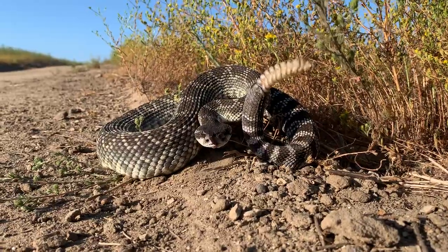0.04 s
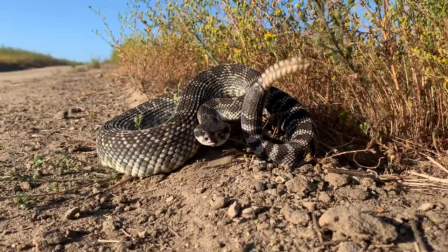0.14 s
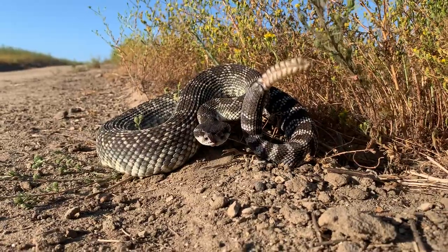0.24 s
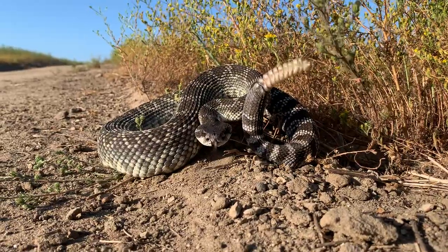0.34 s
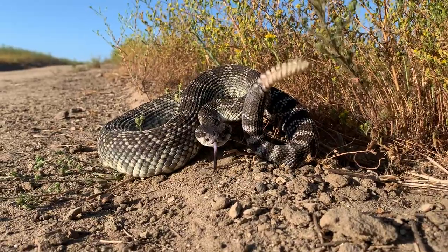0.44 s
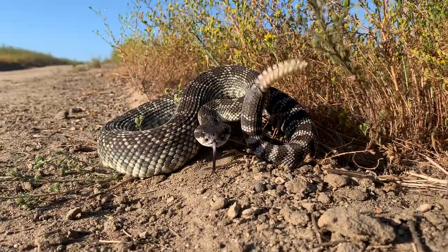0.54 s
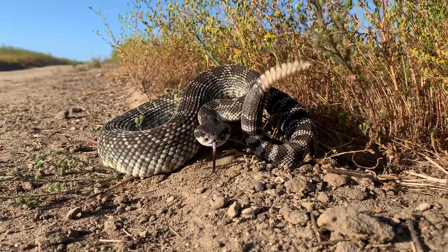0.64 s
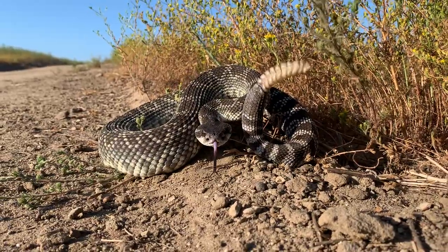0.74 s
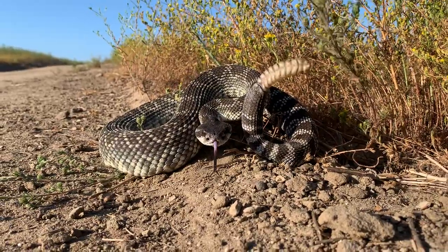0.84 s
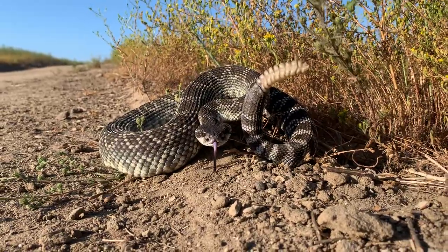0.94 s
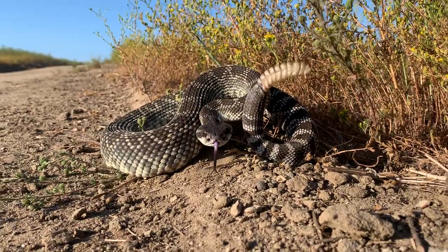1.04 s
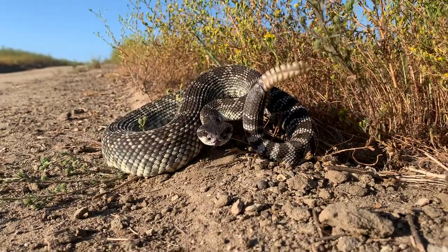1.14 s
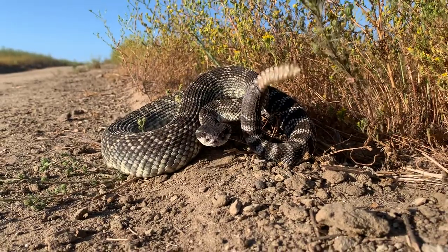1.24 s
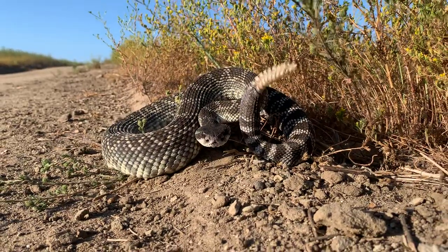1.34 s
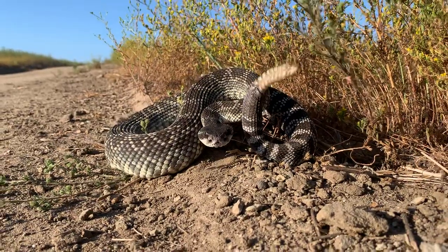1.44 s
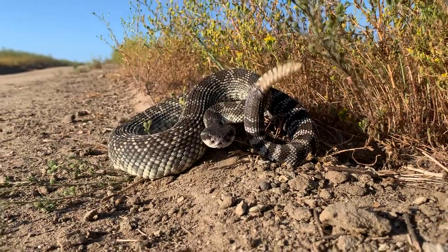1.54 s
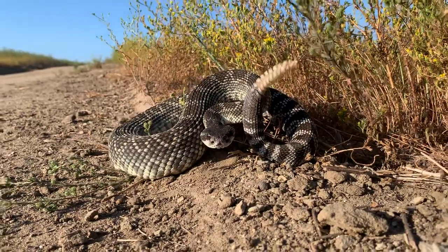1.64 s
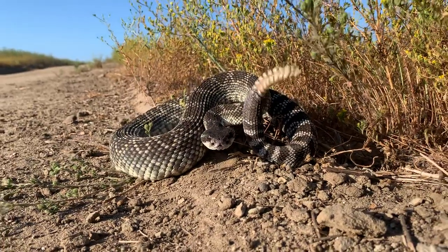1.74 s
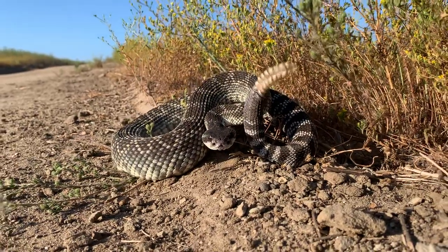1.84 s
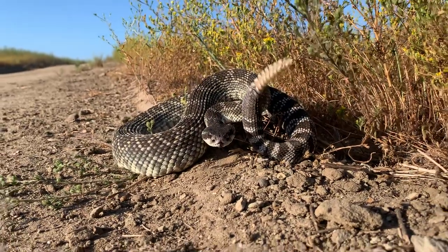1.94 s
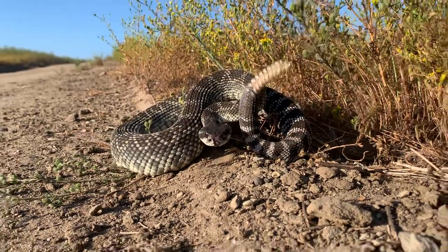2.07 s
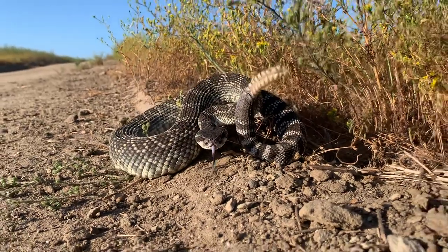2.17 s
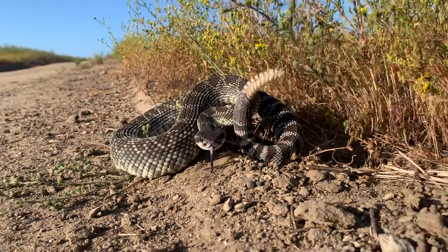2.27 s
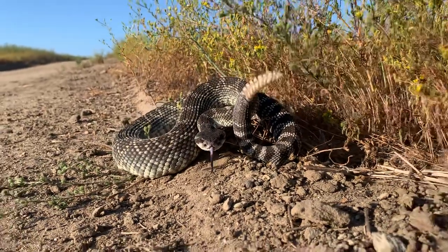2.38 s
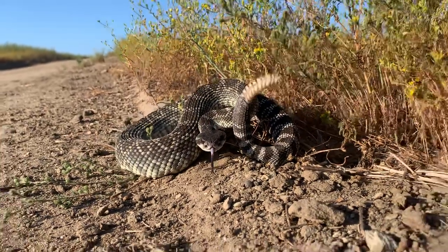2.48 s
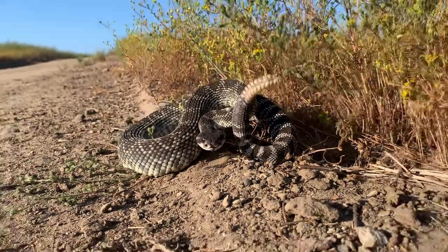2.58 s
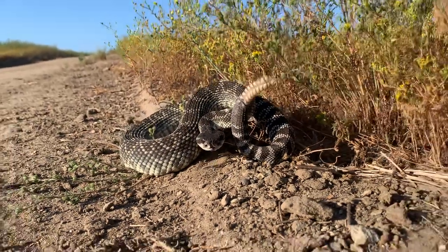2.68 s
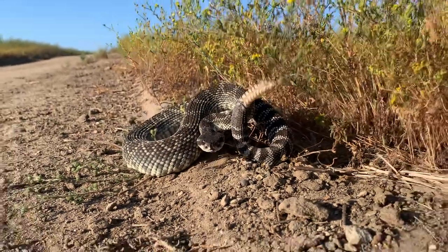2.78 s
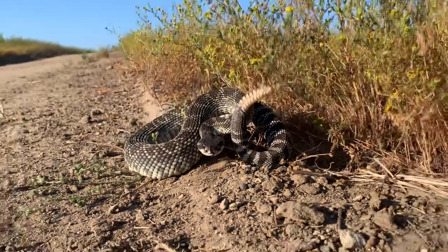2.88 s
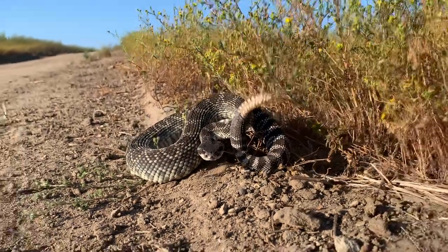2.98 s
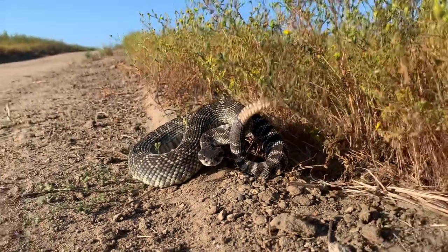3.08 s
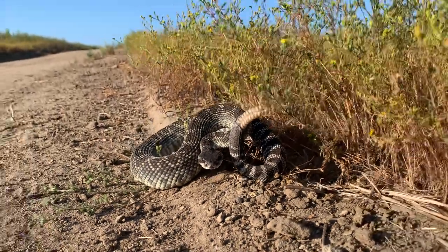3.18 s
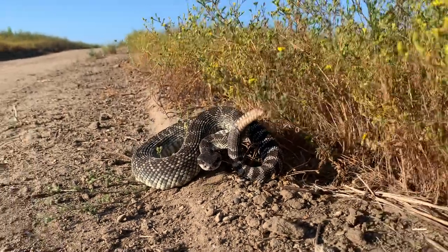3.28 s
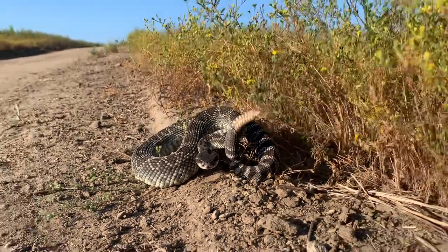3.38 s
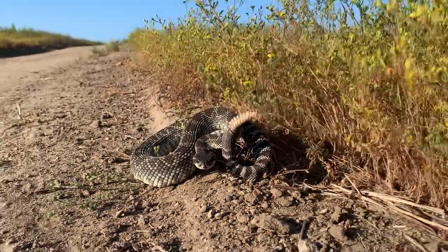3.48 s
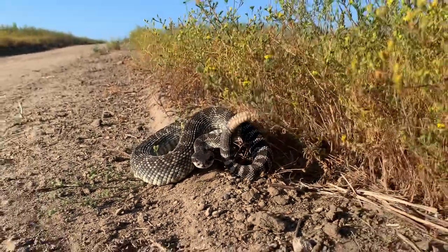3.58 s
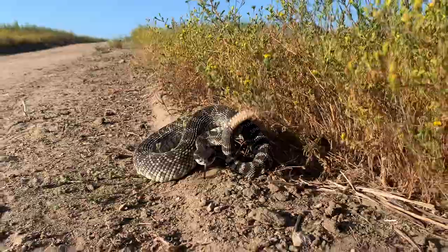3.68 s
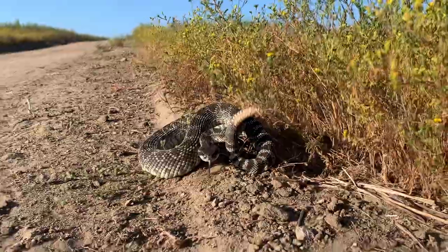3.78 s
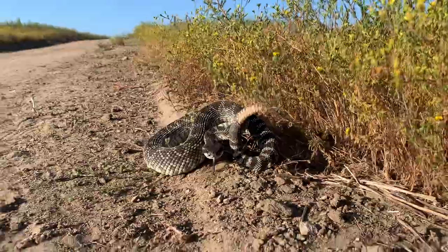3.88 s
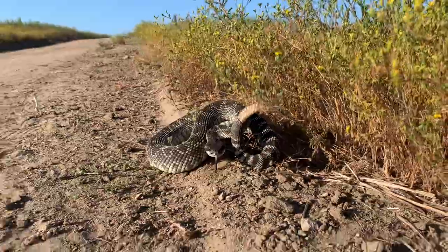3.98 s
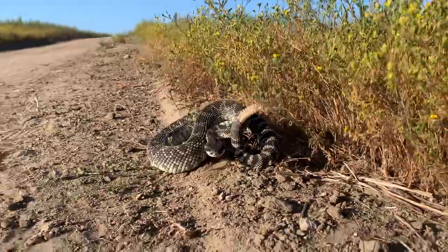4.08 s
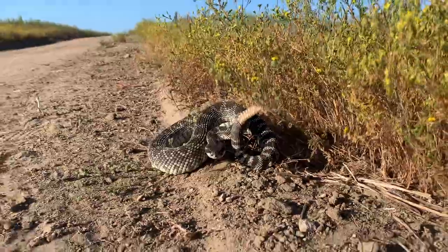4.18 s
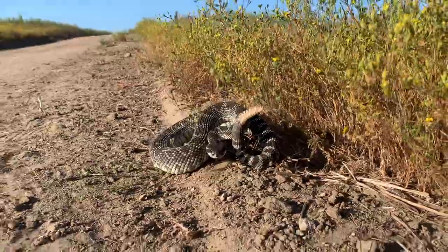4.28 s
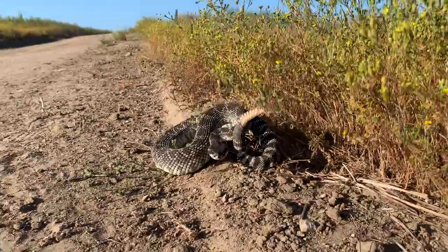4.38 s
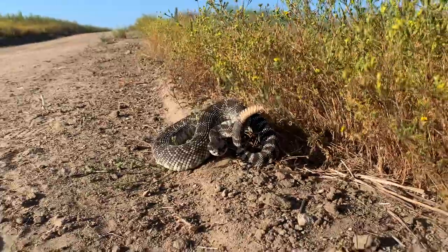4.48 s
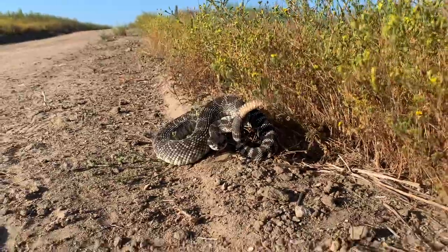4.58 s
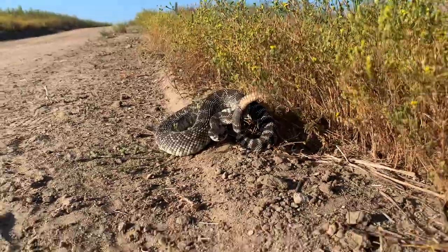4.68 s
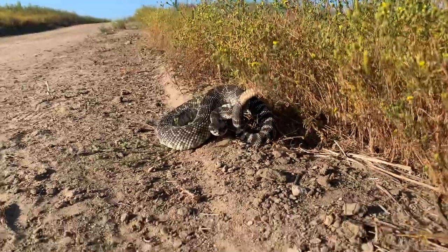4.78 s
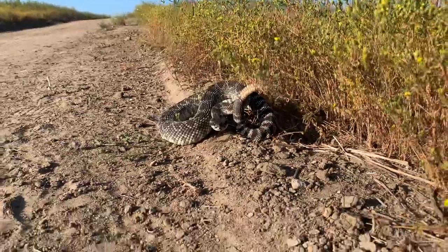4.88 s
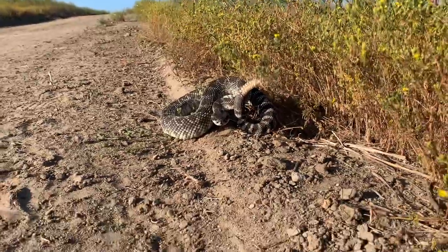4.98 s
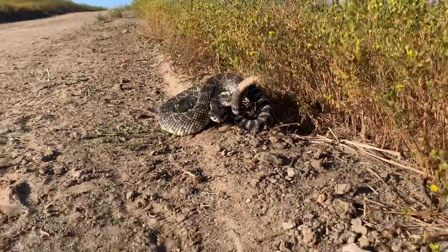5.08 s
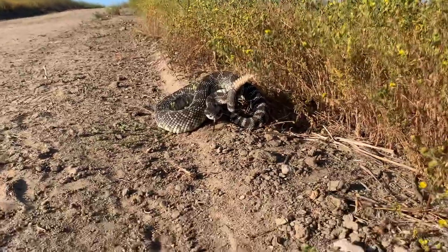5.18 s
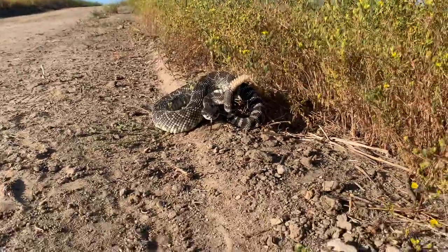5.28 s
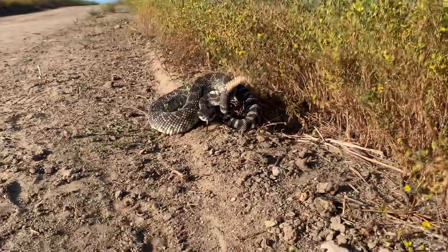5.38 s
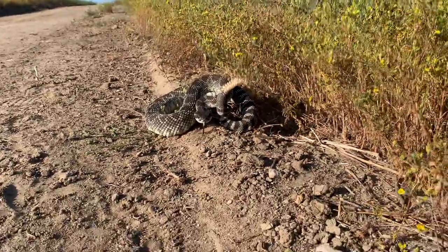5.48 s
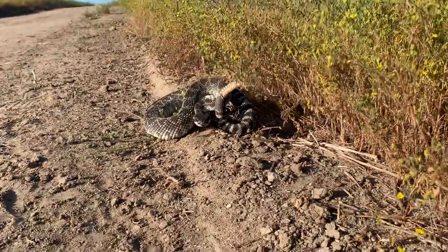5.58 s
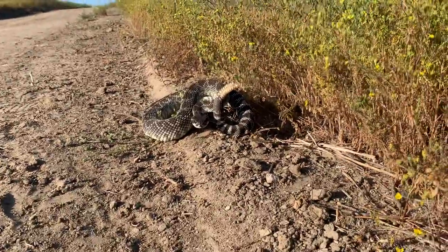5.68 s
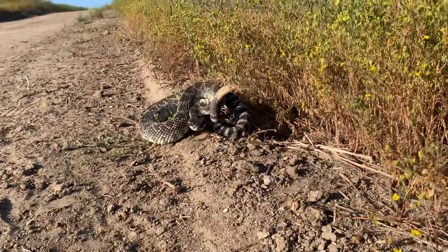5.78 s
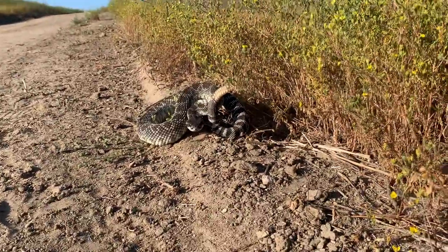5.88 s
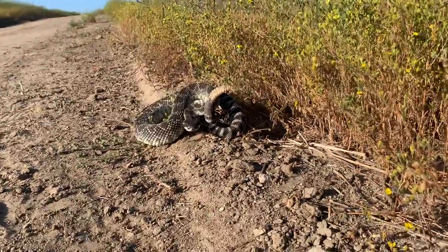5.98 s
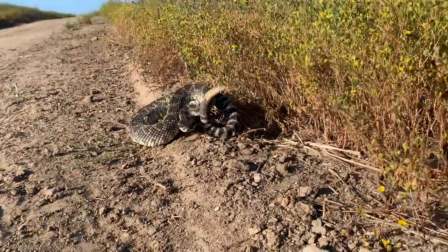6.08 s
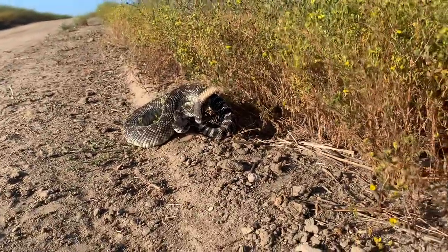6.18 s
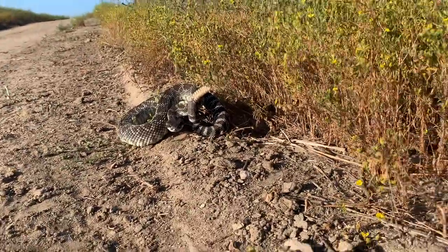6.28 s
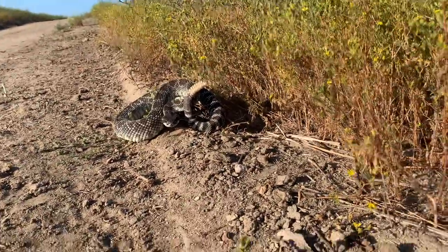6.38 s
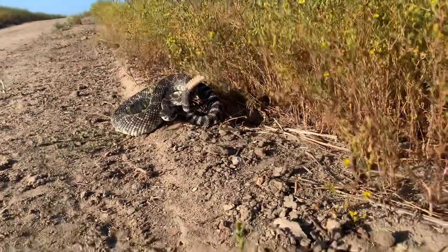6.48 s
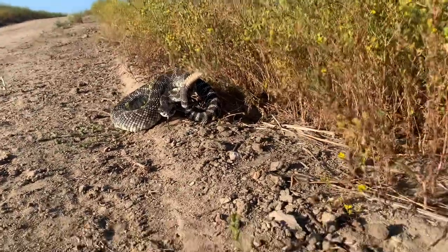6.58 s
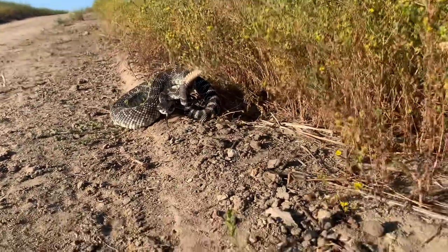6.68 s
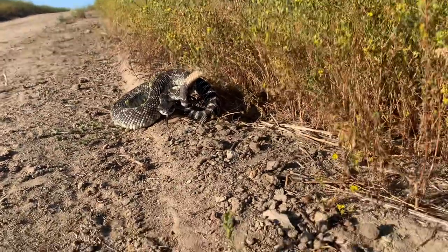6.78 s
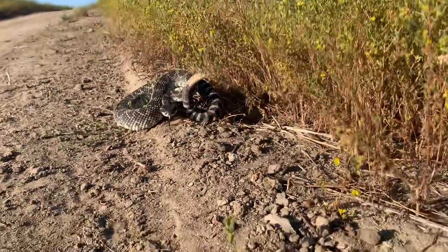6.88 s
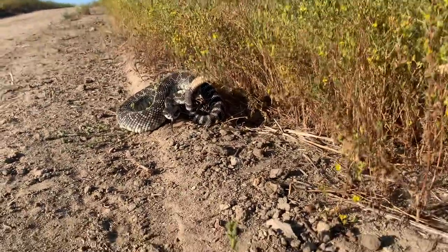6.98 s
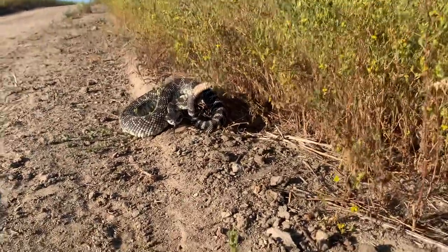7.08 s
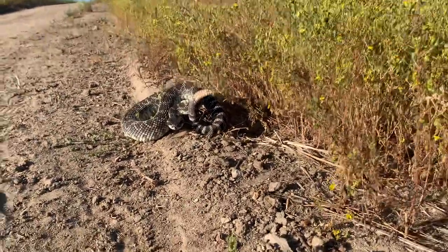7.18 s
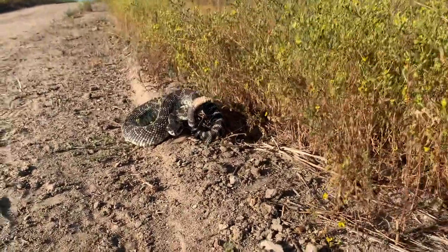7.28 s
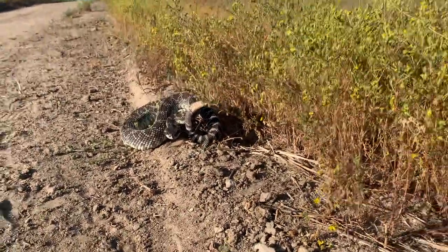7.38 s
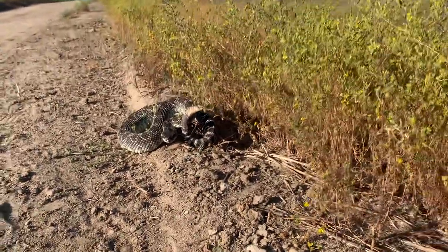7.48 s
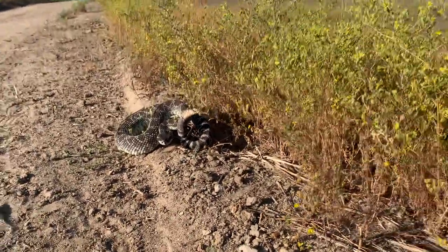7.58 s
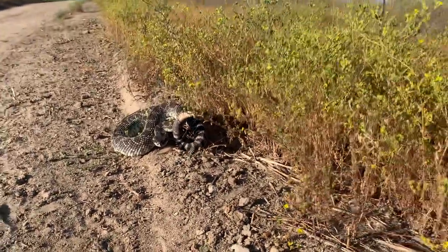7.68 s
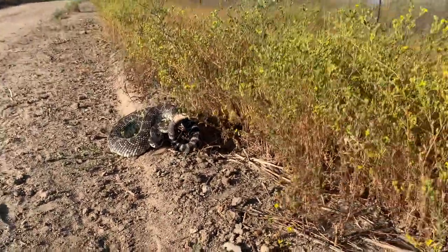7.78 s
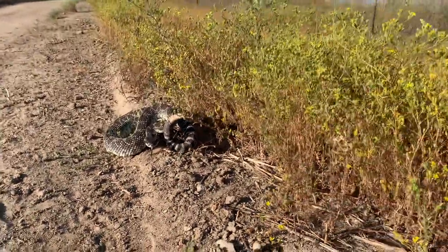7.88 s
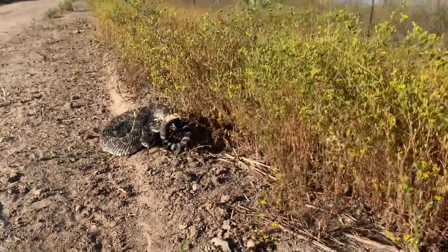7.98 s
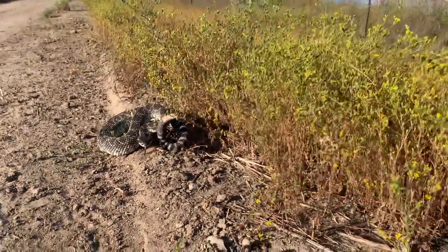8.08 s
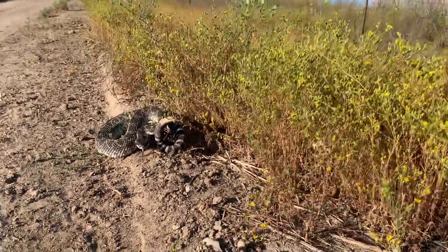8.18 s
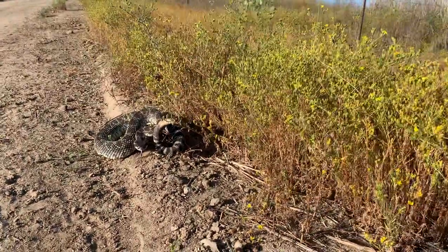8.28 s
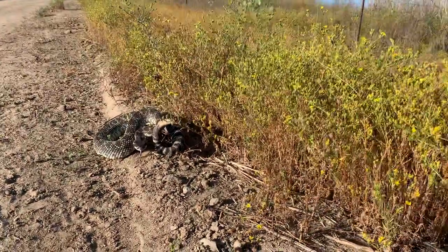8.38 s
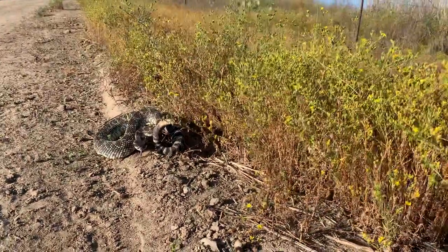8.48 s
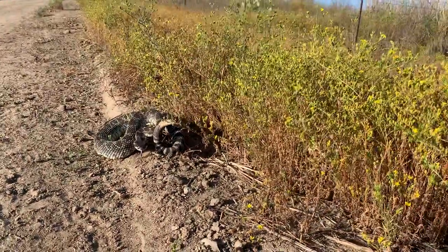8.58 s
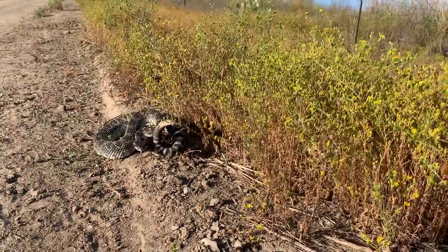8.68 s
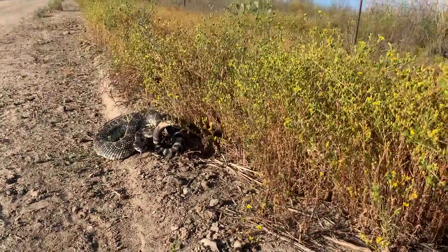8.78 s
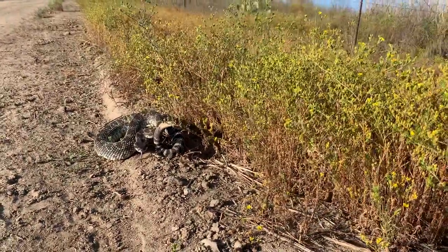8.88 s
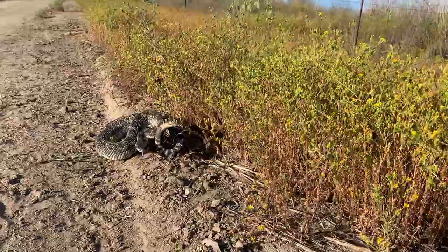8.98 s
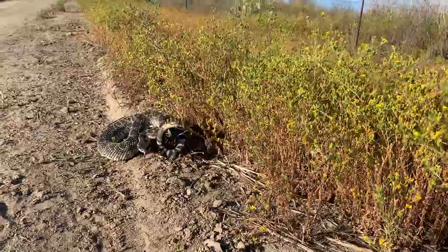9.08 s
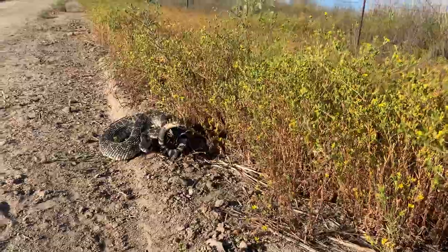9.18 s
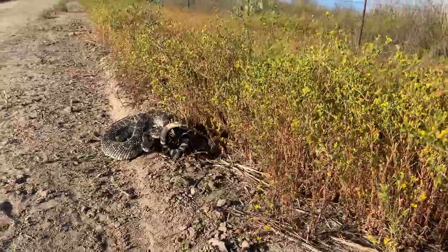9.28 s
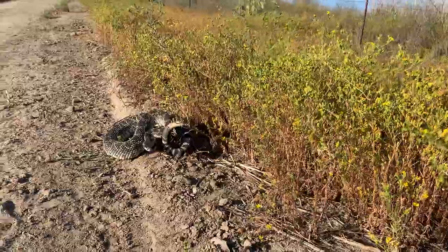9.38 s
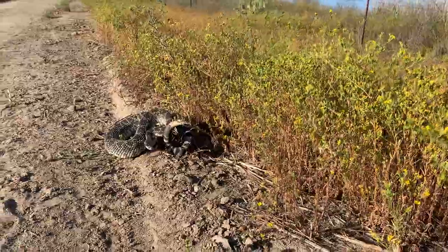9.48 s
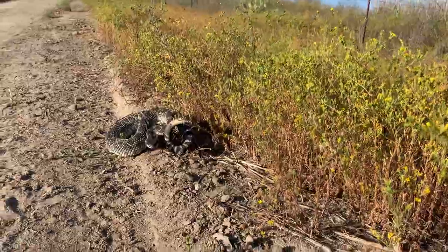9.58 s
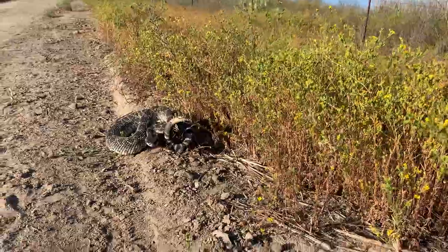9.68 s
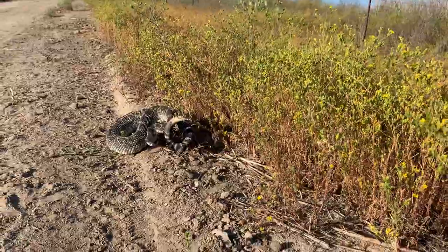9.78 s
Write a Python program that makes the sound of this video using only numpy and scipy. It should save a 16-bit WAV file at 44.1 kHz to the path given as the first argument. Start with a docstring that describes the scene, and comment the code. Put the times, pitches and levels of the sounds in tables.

```python
"""Rattlesnake beside a dirt trail

A coiled rattlesnake shakes the dry, hollow segments of its tail into a buzz; early on it falters for
a second. The microphone is a hand-held phone with two ports, backing away; its processing switches
the 3-8 kHz band abruptly louder and softer. Something hollow knocks close by, a few dry snaps sound,
and a light breeze thuds on the ports. A faint hiss with a thin 1 kHz hum slowly grows louder."""
import sys
import numpy as np
from scipy import signal
from scipy.fft import rfft, irfft, next_fast_len
from scipy.io import wavfile
from scipy.ndimage import uniform_filter1d, map_coordinates

SR = 44100
rng = np.random.default_rng(int(sys.argv[2]) if len(sys.argv) > 2 else 0)


def digitize_waveform(pressure):
    """Quantize a signal to 16-bit integers and store it at the path in sys.argv[1].

    Rows of a 2-D input are taken as channels; values are limited to [-1, 1].
    """
    field = np.atleast_2d(pressure).T
    bounded = np.clip(field, -1, 1)
    quanta = np.round(bounded * 32767).astype(np.int16)
    wavfile.write(sys.argv[1], SR, quanta)


N = 433935
TIME = np.arange(N) / SR
EVENT_TIME = TIME[:SR // 2]  # half a second for a knock or snap to die away


def amp(db):
    """Gain of a dB value."""
    return 10 ** (np.asarray(db) / 20)


def unit(x):
    """x at rms 1."""
    return x / np.sqrt(np.mean(x ** 2) + 1e-20)


def curves(rows, at=TIME):
    """Each column after the first, interpolated at the given times or frequencies."""
    knots, *columns = np.transpose(rows)
    return np.array([np.interp(at, knots, column) for column in columns])


def held(rows, step_s):
    """Each column after the time holds its value until the next row, then steps."""
    starts, *columns = np.transpose(rows)
    row = np.searchsorted(starts, TIME, side="right") - 1
    return np.array([uniform_filter1d(column[row], size=round(step_s * SR)) for column in columns])


def wobble(rate):
    """A smooth random curve, rate knots a second."""
    return map_coordinates(rng.standard_normal(int(N * rate / SR) + 4), [TIME * rate])


def filtered(x, response):
    """x times a response of frequency."""
    size = next_fast_len(N + 8192)
    return irfft(rfft(x, size) * response(np.fft.rfftfreq(size, 1 / SR)), size)[..., :N]


def coloured(x, spectrum):
    """x through a (f/Hz, level/dB) shape, scaled to pass white noise at unchanged power."""
    def response(hz):
        knots, db = np.transpose(spectrum)
        gain = amp(np.interp(np.log(hz + 1), np.log(knots + 1), db))
        gain *= (hz > knots[0]) & (hz < knots[-1])
        return gain / np.sqrt(np.mean(gain ** 2))
    return filtered(x, response)


def noise_pair(spectrum, apart):
    """Coloured noise at both ports; apart weighs their difference against what they share."""
    mid, side = coloured(rng.standard_normal((2, N)), spectrum)
    return np.array([mid + apart * side, mid - apart * side]) / np.hypot(1, apart)


def left_first(x, lag_s):
    """x reaches the left port, then the right."""
    return np.array([x[:N], np.roll(x[:N], round(lag_s * SR))])


# background hiss and hum at the trailside: f/Hz, relative level/dB
HISS_SPECTRUM = [(150, 5.5), (300, 2), (900, -8.5), (960, -1), (1010, 9.5), (1060, 0), (1130, -2),
                 (3000, -10.5), (15500, -11.5)]

def hiss():
    """A faint hiss with a thin 1 kHz hum slowly grows louder."""
    rise_db_per_s = 0.39
    return amp(-67.5 + rise_db_per_s * TIME) * noise_pair(HISS_SPECTRUM, apart=0.076)


# breeze right on the microphone: t/s, level/dB
BREEZE_LEVEL = [(0, -53), (.4, -57), (.6, -58), (2.7, -51.5), (3.6, -54.5), (6.2, -55.5), (6.95, -55),
                (7.3, -45), (7.42, -52.5), (8.15, -56), (8.6, -52.5), (9.84, -54)]
# its rumble: f/Hz, relative level/dB
BREEZE_SPECTRUM = [(12, -52), (20, -16), (81, 2.5), (113, -5), (151, -4.5), (193, -16), (247, -17.5),
                   (450, -28), (580, -43), (990, -120)]

def breeze():
    """Moving air makes lumpy low thuds, partly shared by the ports."""
    level_db = curves(BREEZE_LEVEL)[0] + 3.7 * wobble(13)
    return amp(level_db) * noise_pair(BREEZE_SPECTRUM, apart=.7)


# single thumps on the phone itself: t/s, level/dB, f/Hz
PHONE_THUMPS = [(2.863, -44, 63.4), (2.933, -38, 62.6), (4.98, -39, 147), (5.685, -35, 163),
                (7.218, -33, 103), (7.259, -35, 96.9), (7.291, -28.5, 84), (8.661, -37.5, 126),
                (9.121, -40.5, 101), (9.571, -33.5, 96.5), (9.658, -36, 67.3)]

def thumps():
    """Each thump is two soft cycles, felt by the ports a moment apart."""
    out = np.zeros(N + SR)
    for s, db, hz in PHONE_THUMPS:
        cycles = np.arange(round(2 * SR / hz)) * hz / SR
        swell = amp(db) * np.sin(np.pi * cycles / 2) ** 2
        out[round((s - .5 / hz) * SR):][:len(cycles)] += swell * np.sin(2 * np.pi * cycles)
    return left_first(out, lag_s=0.00044)


def scattered(x, t60):
    """x after many weak bounces off stems and stones, different at each port."""
    bounces = rng.standard_normal((2, len(EVENT_TIME))) * amp(-60 * EVENT_TIME / t60)
    return signal.fftconvolve(x[None], bounces / np.linalg.norm(bounces[0]), axes=1)[:, :N]


def struck(db, rise_s, t60):
    """Envelope of an impact: a quick rise, then exponential decay."""
    return amp(db - 60 * EVENT_TIME / t60) * (1 - np.exp(-(EVENT_TIME / rise_s) ** 2))


# something hollow near the phone: t/s, base level/dB, f/Hz, t60/s
HOLLOW_KNOCKS = [(4.67, -46.5, 580, 0.07), (4.72, -45, 586, 0.027), (4.934, -36, 740, 0.042),
                 (5.005, -29.5, 616, 0.022), (5.545, -20.5, 700, 0.017), (5.6799, -16.5, 598, 0.066),
                 (6.168, -49, 597, 0.043), (6.424, -44, 553, 0.065), (6.535, -47, 680, .03),
                 (6.655, -36, 650, 0.04), (6.716, -43, 597, 0.04), (6.73, -38, 740, .03),
                 (6.742, -37, 615, 0.038), (6.782, -41, 633, 0.035), (9.011, -33.5, 673, 0.022),
                 (9.049, -43, 638, 0.03), (9.8, -47, 635, 0.034)]
# its modes: multiple of f, gain/dB
HOLLOW_MODES = [(1.002, 6.5), (1.17, -1.5)]

def knocks():
    """Each knock rings two modes; the surroundings add a rough after-ring."""
    rings = np.zeros(N + SR)
    for s, db, hz, t60 in HOLLOW_KNOCKS:
        ring = sum(amp(gain) * np.sin(2 * np.pi * k * hz * EVENT_TIME) for k, gain in HOLLOW_MODES)
        rings[round(s * SR):][:len(ring)] += struck(db, rise_s=0.0024, t60=t60) * ring
    return left_first(rings, lag_s=0.00035) + amp(-20.5) * scattered(rings[:N], t60=0.78)


# thin tones after the hardest snap: f/Hz, level/dB, t60/s
LINGERING_TONES = [(527, -40, 0.17), (697, -50, 1), (870, -53, 0.51)]

def lingering():
    """The hardest snap leaves tones that waver in level as they die."""
    t, tones = EVENT_TIME, 0
    for hz, db, t60 in LINGERING_TONES:
        waver_db = 2.4 * wobble(32)[:len(t)]
        tones += amp(db + waver_db - 60 * t / t60) * np.sin(2 * np.pi * hz * t)
    return tones


# dry snaps, a little to the left: t/s, base level/dB, centre f/Hz, width/octaves, rise/s, t60/s
DRY_SNAPS = [(5.005, -34, 2400, 0.9, 0.00044, 0.0099), (5.672, -21.5, 2100, 0.21, 0.0027, 0.068),
             (5.6763, -6, 3920, 0.15, 0.0017, 0.027), (5.6803, -8, 4600, 1.6, 0.0003, 0.006),
             (6.739, -32.5, 1600, 2.1, 0.00055, 0.019), (7.519, -33.5, 1600, 1.8, 0.00049, 0.037),
             (7.5209, -23.5, 2300, 0.51, 0.00038, 0.02), (7.526, -36, 2300, 2.4, 0.002, 0.086)]

def snaps(linger_s=5.681):
    """Short bands of noise, each with one sharp break in it, joined by the lingering tones."""
    out, length = np.zeros(N + SR), len(EVENT_TIME)
    for s, db, hz, octaves, rise_s, t60 in DRY_SNAPS:
        burst = rng.standard_normal(length) + 4.7 * signal.unit_impulse(length, round(rise_s * SR))
        band_hz = [hz * 2 ** (-octaves / 2), hz * 2 ** (octaves / 2)]
        noise = signal.lfilter(*signal.butter(2, band_hz, "band", fs=SR), burst)
        out[round(s * SR):][:length] += struck(db, rise_s, t60) * unit(noise)
    out[round(linger_s * SR):][:length] += lingering()
    return amp([[0.5], [-0.5]]) * left_first(out, lag_s=.00012)


# off the ground and the person behind the phone: t/s, first delay/ms, second delay/ms, level/dB
REFLECTIONS = [(0, 2.6, 4.4, -30), (5.8, 2.6, 4.4, -20), (6.8, 2.15, 4.2, -10), (7.5, 2.1, 4, -9),
               (7.9, 1.65, 3.85, -7), (8.45, 1.5, 3.75, -6.5), (9.3, 1.5, 3.6, -7.5),
               (9.84, 1.62, 3.8, -10)]

def reflection_comb(hz, t, second_db=-4, top_hz=8000):
    """Two drifting late copies, both short of treble, comb the buzz: gain by frequency and time."""
    first_ms, second_ms, level_db = curves(REFLECTIONS, t)
    late = lambda ms: np.exp(-2j * np.pi * np.outer(hz, ms / 1000))
    gain = amp(level_db) / (1 + (hz[:, None] / top_hz) ** 8)
    return 1 + gain * (late(first_ms) + amp(second_db) * late(second_ms))


# the phone turns through four ways of facing the snake: t/s, facing 0-3
FACING = [(0, 0), (1.5, 0), (3.5, 1), (5, 1.1), (6.2, 2), (7.1, 2.1), (7.45, 3), (9.3, 3), (9.7, 2.5),
          (9.84, 2.5)]
# left port behind right: f/Hz, lag/rad at facing 0, 1, 2, 3
PORT_LAG = [(300, 0, 0, 0, 0), (1500, 1.1, .8, .2, .1), (2300, 3, 2.9, .6, .2), (3100, 3.3, 3.3, .3, 0),
            (3600, 5.2, 5.2, 1, .7), (4650, 11.2, 11.3, 3.3, 2.4), (5800, 14, 12.7, 6.4, 3.3),
            (7300, 15.7, 14.8, 7.7, 2.9), (7900, 13.8, 13.7, 7.4, 1.1), (9500, 13.4, 13.1, 7, .7)]
# colour against facing 0: f/Hz, level/dB at facing 1, 2, 3
FACING_COLOUR = [(800, -4, -1, -7.5), (2430, 0.5, -1, -4), (3380, -3.5, -3, -5), (3980, -4.5, -1, -2.5),
                 (5550, -1, 5, -2), (6880, -4.5, -6.5, -4), (7500, -4, -4.5, -9.5), (8180, 2, 2, 4),
                 (10470, -3, 2.5, -3), (11980, 0, 1.5, 4), (13700, -1.5, 1.5, -1)]
MONO_HZ = 12000  # above this both ports carry the same buzz

def at_ports(pair, patchy_db):
    """The way the phone faces sets the colour and the lag between its ports; reflections comb the buzz."""
    hz, t, spectra = signal.stft(pair, SR, nperseg=1024, noverlap=768)
    facing = curves(FACING, t)[0]
    share = np.clip(1 - np.abs(facing - np.arange(4)[:, None]), 0, 1)
    colour_db = curves(FACING_COLOUR, hz).T @ share[1:]
    lag = np.angle(np.exp(1j * curves(PORT_LAG, hz).T) @ share)
    lag *= np.interp(hz, [PORT_LAG[-1][0], MONO_HZ], [1, 0])[:, None]
    # the hollow segments ring in narrow bands that come and go
    patches = uniform_filter1d(rng.standard_normal(lag.shape), size=5, axis=0)
    patches = uniform_filter1d(patches, size=12, axis=1)
    spectra *= amp(colour_db + patchy_db * unit(patches)) * reflection_comb(hz, t)
    spectra[0] *= np.exp(-1j * lag)
    return signal.istft(spectra, SR, nperseg=1024, noverlap=768)[1][:, :N]


# the tail's effort as heard at the phone: t/s, base level/dB
TAIL_EFFORT = [(0, -26), (.92, -27.5), (1.05, -29), (1.98, -26), (2.2, -25), (4.8, -28), (6.4, -32.5),
               (7.1, -32), (7.3, -30.5), (8.3, -31.5), (9.84, -30.5)]
# the tail nearly stops: slowing t/s, restart t/s, depth/dB, time to die down/s
TAIL_FALTERS = [(1.092, 1.108, 8, .006), (1.147, 1.183, 14.5, 0.025), (1.219, 1.272, 27, 0.038),
                (1.315, 1.369, 23, 0.019), (1.404, 1.464, 29, 0.04), (1.507, 1.547, 33.5, 0.036),
                (1.586, 1.605, 7, .005), (1.646, 1.672, 22, 0.025), (1.713, 1.747, 27, 0.034),
                (1.85, 1.85, 19, .004), (1.896, 1.914, 11, 0.0046), (1.94, 1.966, 3.5, .006)]
# gaps between single swings while it is slow: t/s, depth/dB
SWING_GAPS = [(1.082, 3), (1.097, 6), (1.143, 8), (1.158, 10), (1.178, 7), (1.184, 3), (1.243, 10),
              (1.268, 3), (1.303, 3), (1.309, 4), (1.321, 11), (1.505, 18), (1.59, 5.5), (1.609, 12),
              (1.635, 2), (1.65, 14), (1.704, 14), (1.717, 8), (1.733, 9), (1.782, 2), (1.793, 11),
              (1.803, 5.5), (1.84, 8.5)]

def tail_level(restart_s=0.014, gap_half_width_s=0.0019):
    """The shaking dies into each falter, breaks into single swings and flutters while weak."""
    lost_db = np.zeros(N)
    for slow_s, again_s, depth_db, dying_s in TAIL_FALTERS:
        dying = np.clip((TIME - slow_s) / dying_s, 0, 1)
        recovered = np.clip((TIME - again_s) / restart_s, 0, 1)
        lost_db += depth_db * dying * (1 - recovered)
    gaps_db = sum(db * np.exp(-((TIME - s) / gap_half_width_s) ** 2) for s, db in SWING_GAPS)
    flutter_db = np.minimum(lost_db * .5, 2.5) * wobble(100)
    return amp(curves(TAIL_EFFORT)[0] - lost_db - gaps_db + flutter_db + 0.22 * wobble(35))


# swings of the tail: t/s, f/Hz
SWING_RATE = [(0, 52), (1.6, 49), (2.1, 56.6), (2.7, 61.8), (3.6, 63), (5.1, 60.6), (6.1, 58), (7.1, 59),
              (7.6, 63), (8.7, 59.5), (9.84, 58.6)]

def clicks(count, size_db, t60, bed):
    """Envelope of dry segments knocking together, bunched once, twice and four times a swing."""
    swing_hz = curves(SWING_RATE)[0] + 0.34 * wobble(6)
    phase = 2 * np.pi * np.cumsum(swing_hz) / SR
    bunch_db = .95 * np.cos(phase) + np.cos(2 * phase + 1) + 1.2 * np.cos(4 * phase)
    when, size = rng.random((count, 2)).T
    click_db = -size_db * np.log(1 - size)  # many small, a few large
    power = np.bincount((when * N).astype(int), amp(2 * click_db), N)
    power = signal.lfilter([1], [1, -amp(-120 / (t60 * SR))], power)  # each click dies away
    power = np.abs(uniform_filter1d(power, size=7))
    return unit(np.sqrt(power / power.mean() + bed) * amp(bunch_db))


# bands of the buzz, each: f/Hz, relative level/dB
BODY_AND_TOP = [(300, -41), (450, -28), (800, -20), (1500, -22.5), (2300, -17.5), (3000, -13.5),
                (3500, -11.5), (3900, -37), (7300, -33), (8000, -3), (9000, -1.5), (10600, 1.5),
                (12400, -1), (14000, -3), (15000, -4.5), (15800, 1.5)]  # either side of the middle band
RESONANCE_BAND = [(3000, -34), (3400, -16.5), (3700, -4.5), (4000, 0.5), (4400, 3.5), (4850, -1.5),
                  (5200, -9.5), (5600, -42)]  # lower middle, near 4 kHz
WIDE_RESONANCE = [(2700, -32), (3100, -16), (3450, -4), (3800, 0.5), (4800, 2), (5200, -4.5), (5600, -11),
                  (6000, -40)]  # the same, spread wider
UPPER_MIDDLE = [(4600, -54), (5000, -14), (5450, 3.5), (5850, 6), (6300, 6), (6900, 8), (7500, 5),
                (7900, -0.5), (8250, -32)]  # 5 to 8 kHz
# the phone's processing switches the 3-8 kHz band abruptly louder and softer:
# from t/s, then level/dB of left resonance, left upper, right resonance, right upper
PHONE_BAND_GAINS = [(0, -4.5, -4.5, -14, -6.5), (1.05, -5, -4.5, -12.5, -6),
                    (1.98, -4.5, -4.5, -13.5, -6.5), (2.35, -1.5, -4, -11, -6),
                    (2.5, -2.5, -4.5, -11, -6.5), (2.96, -24, -15.5, -24, -14.5),
                    (3.09, -1.5, -6, -10.5, -7.5), (4.68, 1.5, -3.5, -13, -5), (4.88, -1.5, -4, -14, -5),
                    (5.07, 4, -4, -16, -5), (5.48, -2.5, -4, -16, -6), (5.985, -15, -10.5, -16, -8),
                    (6.16, -5, -9.5, -13.5, -6.5), (6.45, -5, -3.5, -13.5, -4),
                    (6.775, -10.5, -9, -13.5, -8.5), (7.045, -0.5, -4.5, -10, -5.5),
                    (7.295, -11, -6, -12, -4), (7.42, -11.5, -6.5, -12, -5), (7.55, -8, -2, -13, -0.5),
                    (7.775, -9, -12, -10.5, -10.5), (8.3, -9, -7.5, -9.5, -8.5),
                    (8.96, -10, -8.5, -10.5, -5.5), (9.47, -1, -1.5, -12, -3), (9.62, 4, -7.5, -10, -6.5)]

def rattle(step_s=0.033, widens_s=9.47):
    """The tail's buzz arrives directly and off the brush; the phone switches its middle band's gain."""
    strength = tail_level() * clicks(count=16000, size_db=1.5, t60=0.00076, bed=3.8)
    direct = strength * rng.standard_normal(N)
    brush = uniform_filter1d(strength, size=300) * rng.standard_normal((2, N))
    brush = filtered(brush, lambda hz: amp(-8) * np.clip((MONO_HZ - hz) / 3500, 0, 1))
    buzz = at_ports(direct + brush, patchy_db=1.68)
    phone_gains = amp(held(PHONE_BAND_GAINS, step_s))
    resonance_gain, upper_gain = phone_gains[0::2], phone_gains[1::2]
    spread = np.clip((TIME - widens_s) / step_s, 0, 1) * [[1], [0]]  # left port only
    resonance = (1 - spread) * coloured(buzz, RESONANCE_BAND) + spread * coloured(buzz, WIDE_RESONANCE)
    middle = resonance_gain * resonance + upper_gain * coloured(buzz, UPPER_MIDDLE)
    return middle + coloured(buzz, BODY_AND_TOP)


def scene():
    """The snake and the trailside around it, at the phone's two ports."""
    return rattle() + snaps() + knocks() + thumps() + breeze() + hiss()


def record(dry):
    """The phone keeps nothing above its band limit."""
    return filtered(dry, lambda hz: hz < 15900)


dry = scene()
out = record(dry)
digitize_waveform(out)
```